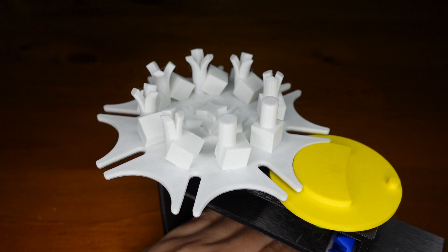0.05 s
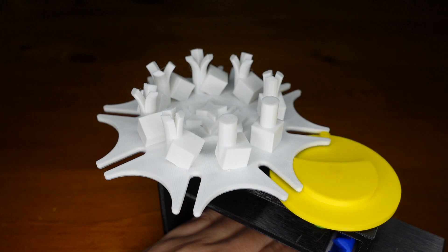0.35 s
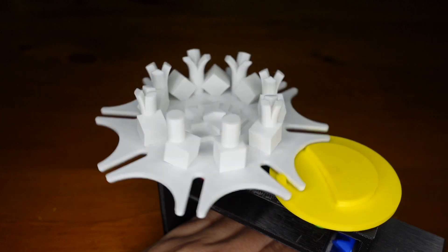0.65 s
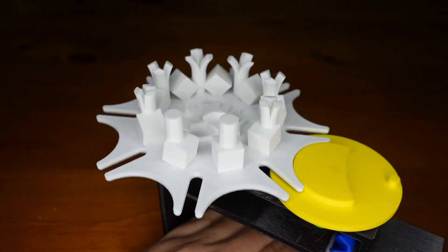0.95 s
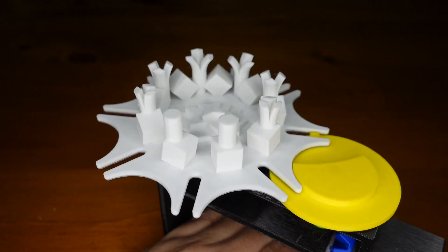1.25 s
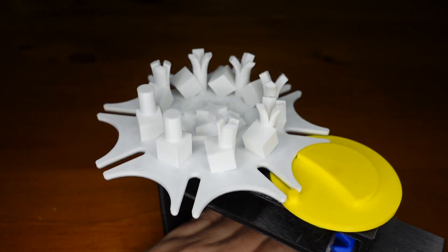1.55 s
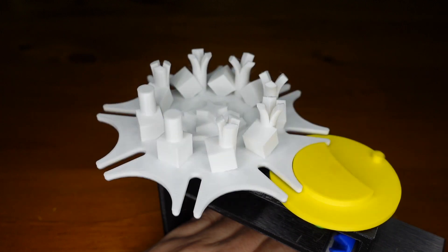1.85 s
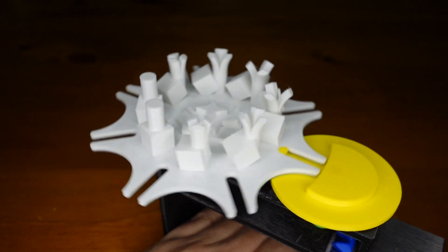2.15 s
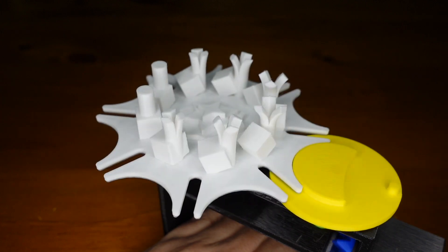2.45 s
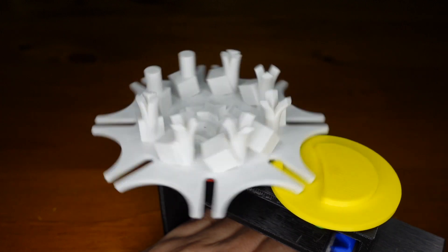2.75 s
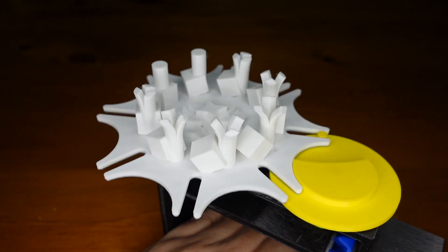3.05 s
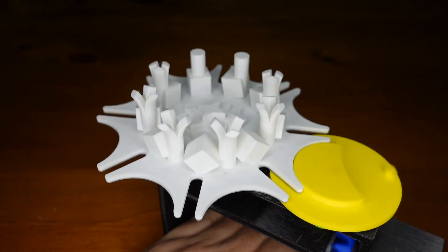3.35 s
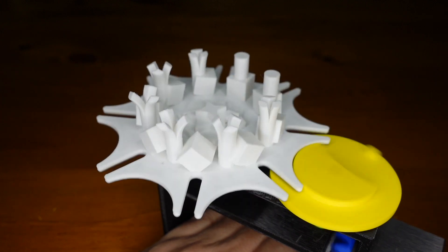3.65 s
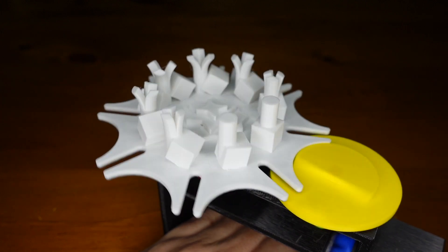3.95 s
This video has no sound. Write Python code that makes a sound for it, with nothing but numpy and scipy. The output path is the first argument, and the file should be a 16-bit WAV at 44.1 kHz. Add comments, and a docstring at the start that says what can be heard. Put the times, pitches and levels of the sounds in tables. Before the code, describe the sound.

A plastic stepping wheel turns close by in a small room. It starts with faint rubbing and isolated clicks, one sharper at about 0.8 seconds, then a cluster of ticks near 1.6. From 1.8 seconds a raspy scrape swells in pulses between clacks, with brief creaks around 3.2. From 3.5 to 4 seconds, snaps, dull knocks and rattling crowd together, loudest and nearly continuous.

```python
"""A plastic stepping wheel, cranked by hand faster and faster, heard close up in a small room.
Impacts excite its resonances: the driver's pin snaps into a slot, the wheel knocks round one step
and its loose pegs tick and rattle. Between steps, stick-slip friction makes the locking disc scrape
along the rim, with brief creaks and hums. The table adds early reflections, the room reverberation."""
import sys
import numpy as np
from scipy import signal
from scipy.fft import rfft, irfft, next_fast_len
from scipy.io import wavfile
from scipy.ndimage import uniform_filter1d, map_coordinates

SR = 44100
rng = np.random.default_rng(int(sys.argv[2]) if len(sys.argv) > 2 else 0)


def generate_wav(sig):
    """Save sig (samples, or channels by samples) to the path in sys.argv[1] as 16-bit PCM at SR."""
    pcm = np.round(np.clip(np.atleast_2d(sig).T, -1, 1) * 32767).astype(np.int16)
    wavfile.write(sys.argv[1], SR, pcm)


N = 176400


def amp(db):
    """Amplitude ratio of a level in decibels."""
    return 10 ** (np.asarray(db) / 20)

def unit(x):
    """Normalisation to an RMS of 1."""
    return x / np.sqrt(np.mean(x ** 2) + 1e-20)

def along(points, hz):
    """Interpolation of (frequency_hz, value) points on a logarithmic frequency axis."""
    frequencies, values = np.transpose(points)
    return np.interp(np.log(hz + 1), np.log(frequencies + 1), values)

def curve(rows):
    """Linear interpolation of (time_s, value) rows at every sample."""
    return np.interp(np.arange(N) / SR, *np.transpose(rows))

def filtered(x, response):
    """Linear filtering: the spectrum is multiplied by a frequency response."""
    size = next_fast_len(N + SR // 2)
    return irfft(rfft(x, size) * response(np.fft.rfftfreq(size, 1 / SR)), size)[..., :N]

def stereo_noise(width, size):
    """Partly correlated white noise; width is the ratio of side to mid."""
    mid, side = rng.standard_normal((2, size))
    return np.array([mid + width * side, mid - width * side])

def wobble(knots_per_s):
    """Smooth random modulation: a spline through Gaussian values."""
    knots = rng.standard_normal(int(N * knots_per_s / SR) + 4)
    return map_coordinates(knots, [np.arange(N) * knots_per_s / SR])

def wandering_shares(count=4, knots_per_s=9, spread_db=6.5):
    """Constant-power mixing: drifting weights whose squares sum to 1."""
    shares = amp(spread_db * np.array([wobble(knots_per_s) for _ in range(count)]))
    return shares / np.linalg.norm(shares, axis=0)

def touched(modes, detune=0.023, spread_db=4.5):
    """Modal excitation: each point of contact favours and shifts the resonances differently."""
    chance = rng.standard_normal((len(modes), 2))
    return [(hz * (1 + detune * shift), width, db + spread_db * favour)
            for (hz, width, db), (shift, favour) in zip(modes, chance)]

def ring(colour, modes, tilt_db=0, size=4096):
    """Minimum-phase impulse response of a resonant part, energy 1; tilt_db is per octave above 700 Hz."""
    hz = np.fft.rfftfreq(size, 1 / SR)
    lift = 1 + sum(amp(db) ** 2 / (1 + (2 * (hz - pitch) / width) ** 2) for pitch, width, db in modes)
    octaves = np.log2(np.maximum(hz, 700))
    cepstrum = irfft(np.log(amp(along(colour, hz) + tilt_db * octaves) * np.sqrt(lift)))
    cepstrum[1:size // 2] *= 2  # folding makes the response causal
    cepstrum[size // 2 + 1:] = 0
    response = irfft(np.exp(rfft(cepstrum)))
    return response / np.linalg.norm(response)

def friction(level_db, colour, modes, grains_per_s, spread_db, t60_s, smooth):
    """Shot noise: decaying grains over a smooth floor drive resonances at a few points of contact."""
    grains = amp(spread_db * np.clip(rng.standard_normal(N), -2, 2))
    grains *= rng.random(N) < grains_per_s / SR
    t = np.arange(SR // 20) / SR
    power = np.abs(signal.fftconvolve(grains ** 2, amp(-60 * t / t60_s) ** 2)[:N])
    force = amp(level_db) * unit(np.sqrt(power / power.mean() + smooth ** 2))
    return sum(signal.fftconvolve(share * force * rng.standard_normal(N), ring(colour, touched(modes)))
               for share in wandering_shares())[:N]

def impacts(rows, colour, modes, attack_s, t60_s, ragged_db):
    """Impact excitation: each contact is a brief ragged chatter that rings the part it strikes."""
    out, t = np.zeros(N + SR), np.arange(SR // 8) / SR
    envelope = amp(-60 * t / t60_s) * (1 - np.exp(-t / attack_s))
    for start_s, db, tilt_db in rows:
        noise, rough = rng.standard_normal((2, len(t)))
        chatter = unit(noise * amp(ragged_db * unit(uniform_filter1d(rough, size=30))))
        hit = signal.fftconvolve(chatter * envelope, ring(colour, touched(modes), tilt_db))
        hit *= np.linalg.norm(envelope) / np.linalg.norm(hit)
        out[round(start_s * SR):][:len(hit)] += amp(db) * hit
    return out[:N]

def glides(rows, fall_octaves, width_hz):
    """Narrow-band noise: friction resonances that swell, fade and fall in pitch."""
    out = np.zeros(N)
    for start_s, length_s, hz, db in rows:
        progress = np.clip((np.arange(N) / SR - start_s) / length_s, 0, 1)
        phase = 2 * np.pi * np.cumsum(hz * 2 ** (-fall_octaves * progress)) / SR
        rough = wobble(width_hz) + 1j * wobble(width_hz)
        swell = np.sqrt(np.abs(np.sin(np.pi * progress)))
        out += amp(db) * swell * unit(np.real(rough * np.exp(1j * phase)))
    return out


# spectrum of the room's still air: frequency_hz, relative_db
AIR_SPECTRUM = [(25, -32), (150, 0), (700, 6), (1000, -1.5), (1500, 9), (2400, -9), (6000, -11),
                (15500, -22)]

def air(level_db=-65.5):
    """Ambient noise: faint, steady and uncorrelated between left and right."""
    return amp(level_db) * unit(filtered(stereo_noise(1, N), lambda hz: amp(along(AIR_SPECTRUM, hz))))

# reverberation time: frequency_hz, t60_s
ROOM_DECAY = [(100, 0.54), (400, 0.55), (1000, 0.22), (3000, 0.27), (8000, 0.28), (15000, 0.54)]
# strength of the reverberation: frequency_hz, gain_db
ROOM_GAIN = [(50, -3), (165, 7), (400, -1), (1000, -5.5), (3000, -10.5), (10000, -17)]

def room(x, count=4, build_s=0.0094):
    """Reverberation: diffuse tails, strongest in the bass, build up and decay exponentially."""
    turn = np.arange(N) * count // SR % count  # the tails take turns, so the colour varies
    out = np.zeros((2, N))
    for k in range(count):
        hz, t, spectra = signal.stft(stereo_noise(0.24, SR // 2), SR, nperseg=512)
        decay = amp(-60 * t / along(ROOM_DECAY, hz)[:, None]) * (1 - np.exp(-t / build_s))
        decay /= np.sqrt(np.mean(decay ** 2, axis=1, keepdims=True))
        tail = signal.istft(spectra * decay, SR, nperseg=512)[1] / np.sqrt(SR // 2)
        out += signal.fftconvolve((x * (turn == k))[None], tail, axes=1)[:, :N]
    return filtered(out, lambda hz: amp(along(ROOM_GAIN, hz)))

def tabletop(x, t60_s=0.034, gain_db=-5, low_cut_hz=1800):
    """Early reflections: the treble scatters among pegs, base and table along shifting paths."""
    t = np.arange(SR // 20) / SR
    early = np.zeros((2, N))
    for share in wandering_shares():
        echoes = stereo_noise(0.44, len(t)) * amp(-60 * t / t60_s) * (t > .001)
        echoes /= np.linalg.norm(echoes[0])
        early += signal.fftconvolve((x * share)[None], echoes, axes=1)[:, :N]
    return amp(gain_db) * filtered(early, lambda hz: hz ** 2 / (hz ** 2 + low_cut_hz ** 2))

# hums of the driver's disc: start_s, length_s, level_db
DISC_HUMS = [(1.852, 0.083, -61.5), (2.254, 0.15, -59.5), (2.505, 0.102, -56), (2.83, 0.13, -52.5)]

def disc_hums(pitch_hz=752):
    """Friction-driven resonance: the driver's disc hums briefly, sagging a little in pitch."""
    rows = [(start_s, length_s, pitch_hz, db) for start_s, length_s, db in DISC_HUMS]
    return glides(rows, fall_octaves=.06, width_hz=90)

# creaks of pin and rim: start_s, length_s, starting_pitch_hz, level_db
PIN_CREAKS = [(2.93, 0.14, 1470, -48), (3.226, .05, 4180, -31.5), (3.232, 0.037, 2514, -36),
              (3.232, 0.0286, 877, -44.5), (3.297, 0.0404, 1698, -39.5), (3.302, 0.035, 2950, -37)]

def pin_creaks():
    """Sliding friction: pin and rim sound rough, falling tones."""
    return glides(PIN_CREAKS, fall_octaves=.25, width_hz=380)

# hollow resonances of the pegs: pitch_hz, width_hz, lift_db
PEG_RESONANCES = [(1220, 34, 19.5), (1454, 104, 17), (2590, 120, 12), (3195, 150, 19.5), (4820, 160, 14)]
# spectral envelope of a peg contact: frequency_hz, relative_db
PEG_SPECTRUM = [(80, -16), (1000, -9), (3000, -4.5), (6500, -8.5), (15500, -37)]
# drag of the pegs: time_s, level_db
PEG_DRAG = [(.11, -110), (.138, -56), (.16, -71.5), (.27, -53.5), (.32, -79), (.4, -110)]

def peg_rasp():
    """Light friction: the pegs drag in their seats as the wheel takes up its slack."""
    return friction(curve(PEG_DRAG), PEG_SPECTRUM, PEG_RESONANCES,
                    grains_per_s=320, spread_db=3, t60_s=0.0093, smooth=0.48)

# peg contacts: start_s, relative_db, tilt_db_per_octave
PEG_TICKS = [(.5184, -38, 2.5), (.942, -28.5, -1.5), (.9933, -31.5, -2), (1.101, -33.5, -2.5),
             (1.140, -36, -3.5), (1.18, -41.5, -4), (1.5459, -34, -6), (1.610, -24.5, -6),
             (1.7278, -30.5, 6), (1.7529, -25, 4.5), (1.787, -28.5, 6), (2.007, -26, 2), (2.061, -28.5, 8),
             (2.178, -31.5, 12.5), (3.3875, -23, 2), (3.4458, -24.5, 0.5), (3.492, -20.5, 3)]

def peg_ticks(gain_db=-9):
    """Free vibration: light impacts set the hollow pegs ringing."""
    return amp(gain_db) * impacts(PEG_TICKS, PEG_SPECTRUM, PEG_RESONANCES,
                                  attack_s=0.0018, t60_s=0.027, ragged_db=0.5)

# resonances of disc and rim: pitch_hz, width_hz, light_lift_db, pressed_lift_db
DISC_RESONANCES = [(3130, 135, 11, 10.5), (3804, 95, 11.5, 11.5), (4440, 93, 2, 13.5),
                   (4930, 193, 16.5, 9.5), (5225, 180, 11.5, 14), (7300, 180, 16, 14),
                   (7800, 240, 17.5, 17), (9460, 200, 6, 12.5)]
# rub of the disc's edge as the crank starts: time_s, level_db
EDGE_RUB = [(0, -91), (.04, -63.5), (.1, -102), (.13, -68), (.27, -66), (.36, -110)]

def edge_rub():
    """Single-mode response: barely loaded, the disc rings at one high resonance only."""
    pitch, width, *_ = DISC_RESONANCES[6]
    band = filtered(rng.standard_normal(N), lambda hz: 1 / (1 + ((hz - pitch) / width) ** 2))
    return amp(curve(EDGE_RUB)) * unit(band)

# scrape of the locking disc, swelling with each push on the crank: time_s, relative_db
SCRAPE_LEVEL = [(1.31, -110), (1.35, -69.5), (1.5, -80), (1.815, -81), (1.822, -41), (1.94, -37),
                (2.0, -54), (2.15, -74.5), (2.22, -53.5), (2.31, -33), (2.34, -41.5), (2.43, -42),
                (2.48, -33), (2.6, -36), (2.71, -41), (2.82, -37.5), (2.865, -26.5), (2.89, -36),
                (2.97, -25.5), (3.0, -36.5), (3.12, -38.5), (3.16, -54), (3.21, -39), (3.24, -31),
                (3.285, -39), (3.42, -78), (3.57, -54), (3.585, -30), (3.62, -55), (4, -70)]
# spectral envelope of the scrape: frequency_hz, relative_db
SCRAPE_SPECTRUM = [(200, -27), (1000, -20), (1800, -9), (2800, 0), (4300, -1), (6200, -4.5), (8000, -4.5),
                   (8800, -11.5), (11500, -4), (13500, -15.5), (15500, -51)]

def disc_scrape(gain_db=-1, catches_per_s=95, slip_db=9, uneven=.45, pressed_from_s=2.32):
    """Stick-slip friction: the disc catches on the ridged rim; pressed home, it favours other modes."""
    catches = np.cumsum(catches_per_s * np.exp(uneven * wobble(catches_per_s))) / SR
    level_db = curve(SCRAPE_LEVEL) + gain_db + slip_db * (.5 - catches % 1)
    light_modes = [(hz, width, db) for hz, width, db, _ in DISC_RESONANCES]
    pressed_modes = [(hz, width, db) for hz, width, _, db in DISC_RESONANCES]
    light, pressed = (friction(level_db, SCRAPE_SPECTRUM, modes,
                               grains_per_s=1000, spread_db=4.5, t60_s=0.0065, smooth=0.77)
                      for modes in (light_modes, pressed_modes))
    return np.where(np.arange(N) < pressed_from_s * SR, light, pressed)

# resonances of wheel and frame: pitch_hz, width_hz, lift_db
WHEEL_RESONANCES = [(1262, 69, 8), (1476, 58, 14), (1790, 110, 1), (2070, 110, 5), (3274, 730, 4),
                    (4815, 470, 11.5), (5120, 190, 6), (6710, 55, 5), (7140, 330, 4)]
# rattle of the turning wheel: time_s, relative_db
RATTLE_LEVEL = [(0, -74), (.62, -65.5), (.75, -54), (.78, -42.5), (.88, -66.5), (1.5, -73.5), (1.63, -45.5),
                (1.8, -61), (2.05, -59), (2.2, -63.5), (2.35, -46.5), (2.44, -49), (2.8, -44), (2.95, -38),
                (3.12, -48), (3.24, -44), (3.32, -30.5), (3.38, -50.5), (3.47, -61.5), (3.53, -57.5),
                (3.55, -68), (3.64, -40), (3.66, -26), (3.74, -34), (3.85, -38.5), (3.88, -28.5),
                (3.97, -39), (4, -32)]
# spectral envelope of the rattle: frequency_hz, relative_db
RATTLE_SPECTRUM = [(30, -25), (100, -21), (300, -8), (500, -7.5), (900, -0.5), (1500, -2), (3000, -1.5),
                   (6000, -11.5), (10000, -12.5), (15500, -27)]

def wheel_rattle(gain_db=-1.5):
    """Random excitation: loose parts bump about while the wheel turns."""
    return friction(curve(RATTLE_LEVEL) + gain_db, RATTLE_SPECTRUM, WHEEL_RESONANCES,
                    grains_per_s=320, spread_db=4, t60_s=0.013, smooth=0.72)

# contacts of wheel and axle: start_s, relative_db, tilt_db_per_octave
AXLE_KNOCKS = [(.760, -28.5, -4.5), (.786, -33, -1), (1.629, -37, 0), (2.340, -21.5, -3), (2.876, -20, -1),
               (3.148, -22, 3.5), (3.304, -20.5, -2), (3.314, -25, 1.5), (3.547, -17.5, 3.5),
               (3.656, -20, 4), (3.667, -18, -0.5), (3.691, -15, 7), (3.795, -13.5, 2.5), (3.865, -12, 3),
               (3.897, -16, 6), (3.914, -16.5, 6), (3.988, -8.5, 3.5)]
# spectral envelope of a knock: frequency_hz, relative_db
KNOCK_SPECTRUM = [(40, -24), (120, -11), (450, -7), (900, -1), (1600, -2), (3000, 0), (5000, -18),
                  (9000, -20.5), (15500, -46)]

def wheel_knocks(gain_db=-6.5):
    """Damped vibration: the wheel knocks dully on its axle."""
    return amp(gain_db) * impacts(AXLE_KNOCKS, KNOCK_SPECTRUM, WHEEL_RESONANCES,
                                  attack_s=0.0011, t60_s=0.045, ragged_db=3)

# contacts of pin and slot: start_s, relative_db, tilt_db_per_octave
PIN_SNAPS = [(.4334, -33.5, -5.5), (.490, -33, -4), (.752, -22.5, -4), (.7595, -18.5, -4.5),
             (1.570, -41, 3), (1.616, -26, 0), (1.6424, -27.5, 7.5), (1.662, -31.5, 0), (1.821, -25.5, 4),
             (2.086, -30.5, -4.5), (2.3205, -17.5, 7), (2.361, -23, 2.5), (2.617, -18.5, 3),
             (2.7245, -18.5, 4), (2.776, -19, 4), (2.867, -15, 12.5), (3.232, -13.5, 1), (3.276, -14.5, 1),
             (3.2988, -12, 3), (3.3257, -24.5, 9), (3.5386, -19, 2), (3.576, -20, 2.5), (3.590, -14.5, 1),
             (3.6085, -22.5, -3), (3.651, -14.5, 2.5), (3.6624, -18.5, 10), (3.713, -16.5, 8.5),
             (3.803, -18.5, -4), (3.826, -27, -2), (3.860, -14.5, 9), (3.869, -15, 10), (3.9597, -18, -2),
             (3.9868, -15, 10)]
# spectral envelope of a snap: frequency_hz, relative_db
SNAP_SPECTRUM = [(80, -25), (500, -19.5), (1500, -4.5), (3000, 0), (5000, -1), (8000, 2.5), (9200, -5.5),
                 (11500, -8.5), (15500, -30.5)]

def pin_snaps(gain_db=-2.5):
    """Hard impact: the pin's brief contact with a slot excites the wheel over a broad band."""
    return amp(gain_db) * impacts(PIN_SNAPS, SNAP_SPECTRUM, WHEEL_RESONANCES,
                                  attack_s=0.0013, t60_s=0.023, ragged_db=2.5)

# stereo balance: frequency_hz, left_over_right_db
BALANCE = [(200, 0), (2100, -0.5), (3500, -3.5), (5100, -6.5), (6200, -2.5), (7500, -2.5), (11000, -0.7)]

def scene():
    """Superposition: direct sound and reflections, a little to the right, over the room's air."""
    direct = (disc_scrape() + edge_rub() + peg_rasp() + wheel_rattle() + pin_creaks() + disc_hums()
              + pin_snaps() + wheel_knocks() + peg_ticks())
    heard = direct + tabletop(direct) + room(direct)
    sides = np.array([[.5], [-.5]])
    return filtered(heard, lambda hz: amp(along(BALANCE, hz) * sides)) + air()

def record(dry, low_cut_hz=115, top_hz=15750):
    """Band limiting: the microphone thins the deep bass and passes nothing above top_hz."""
    return filtered(dry, lambda hz: hz / np.hypot(hz, low_cut_hz) * (hz < top_hz))


dry = scene()
out = record(dry)
generate_wav(out)
```